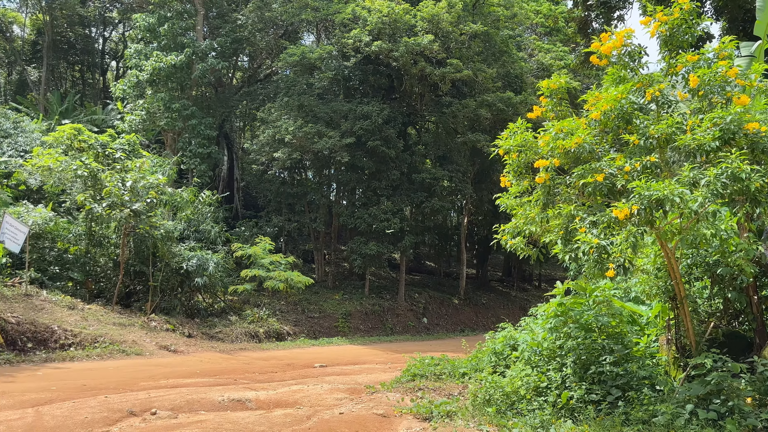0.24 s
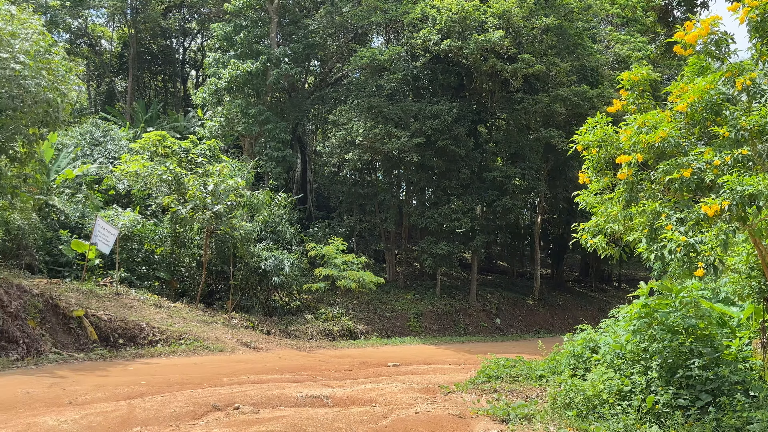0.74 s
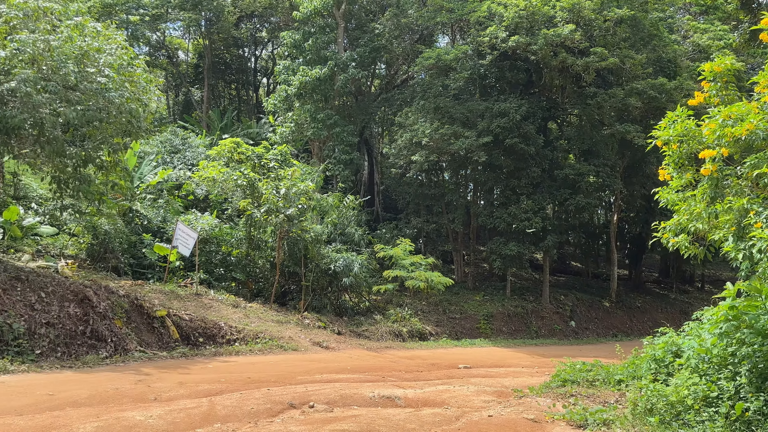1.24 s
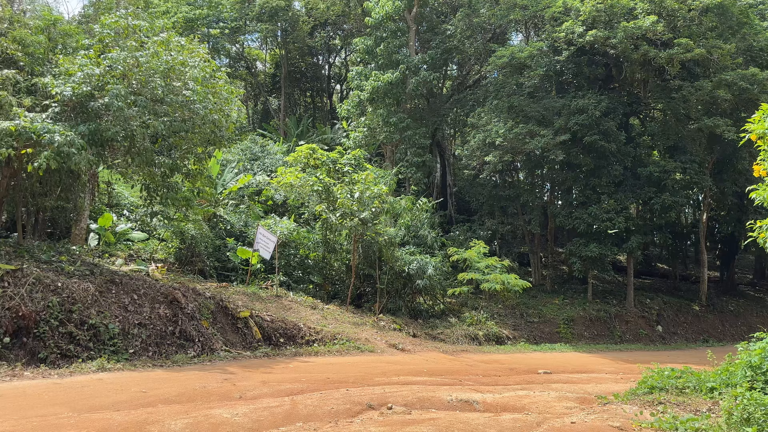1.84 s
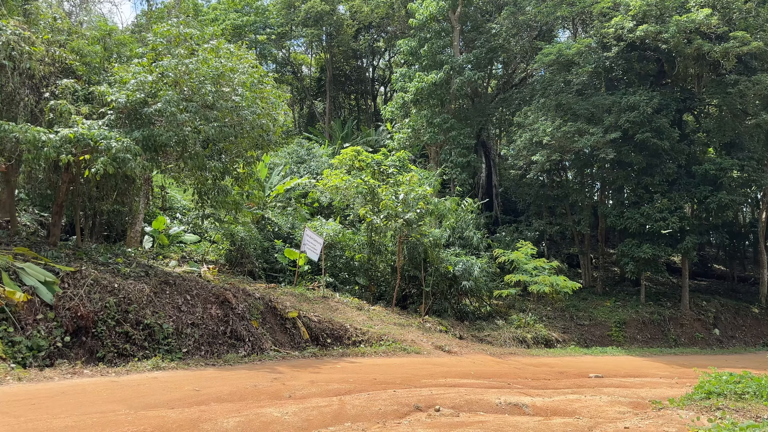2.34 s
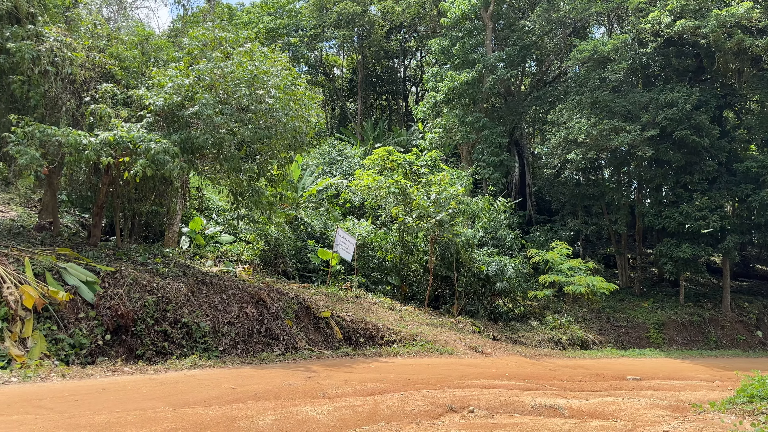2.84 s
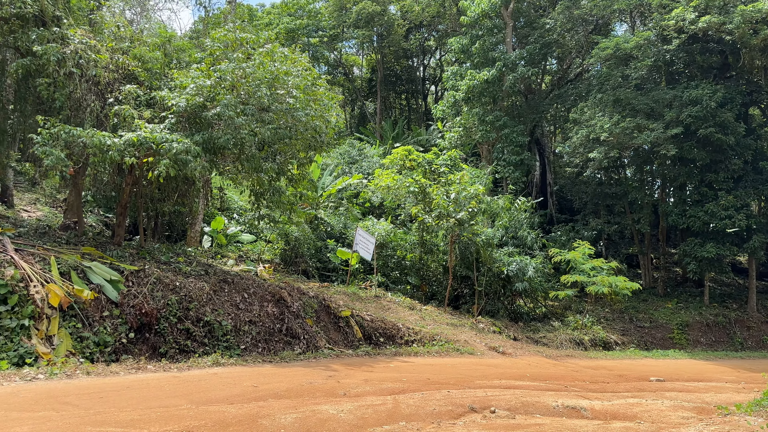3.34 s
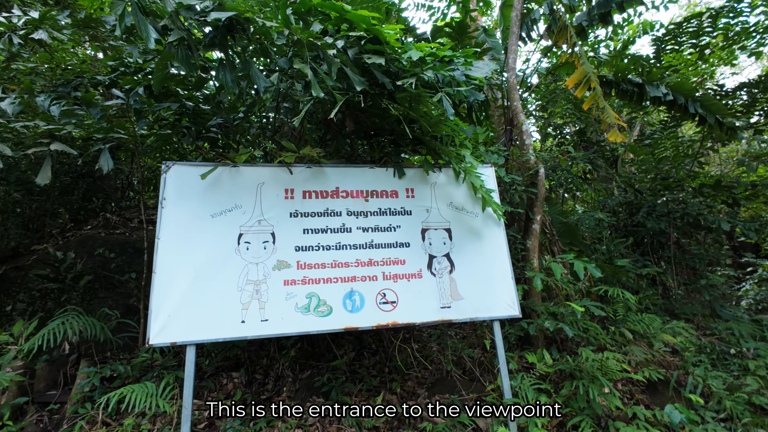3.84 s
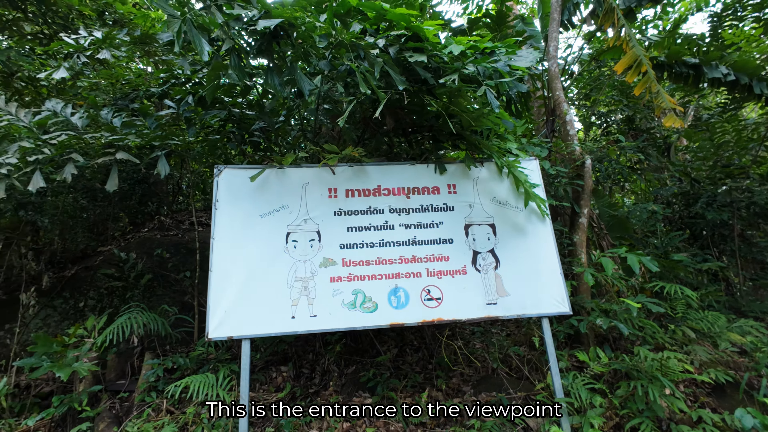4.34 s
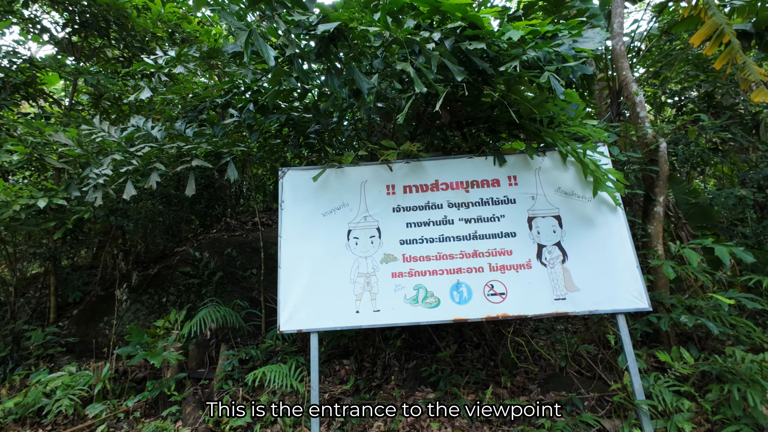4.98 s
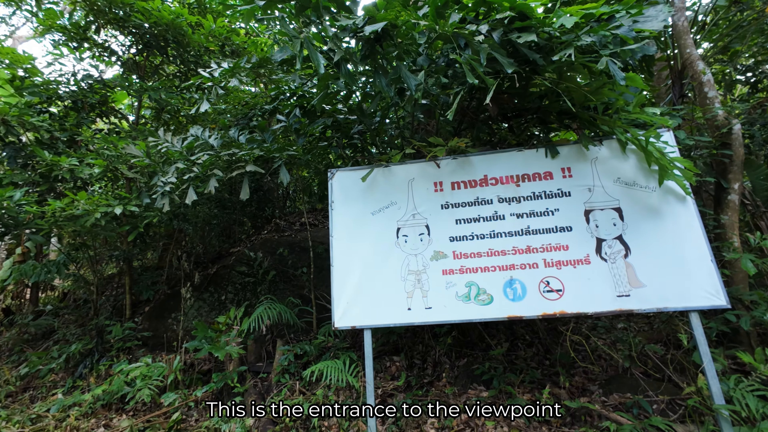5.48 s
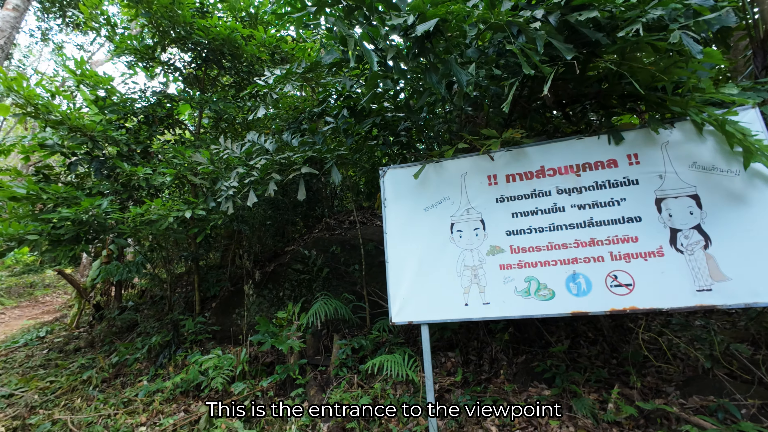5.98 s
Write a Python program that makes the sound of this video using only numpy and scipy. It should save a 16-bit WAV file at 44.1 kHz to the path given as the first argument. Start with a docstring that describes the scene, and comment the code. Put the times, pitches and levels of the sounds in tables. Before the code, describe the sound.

First an open roadside with a wide, bright insect band leaning left: a falling bird whistle, one boomy car door slam ringing off the trees, faint bird notes, then a gritty footstep. Then a sudden change to a closer, mono spot under trees, with a much softer insect hiss, three pulsing cricket chirps, low wind buffeting, a dry woody crack and leaf rustle near the end.

```python
"""Tropical forest: road, then trail

Two spots joined by a cut. At a dirt road (stereo) insects drone, a katydid buzzes very high, small birds
whistle, a car door slams and a shoe scuffs the ground. On a trail under the trees (mono) a cricket chirps,
a bird answers, a twig snaps, leaves rustle and wind bumps the microphone. Struck objects are sums of decaying
modes, calls are gliding or pulsed sines, and grit, wind, choruses and air are shaped noise."""
import sys
import numpy as np
from scipy import signal
from scipy.fft import rfft, irfft
from scipy.io import wavfile
from scipy.ndimage import uniform_filter1d

SR = 44100
rng = np.random.default_rng(int(sys.argv[2]) if len(sys.argv) > 2 else 0)


def transcribe(signal):
    """Save signal, clipped to [-1, 1], as a 16-bit WAV file at the path in sys.argv[1]."""
    frames = np.atleast_2d(signal).T
    limited = np.clip(frames, -1, 1)
    pcm = np.round(limited * 32767).astype(np.int16)
    wavfile.write(sys.argv[1], SR, pcm)


N = 273928
T = np.arange(N) / SR
HZ = np.maximum(np.fft.rfftfreq(N, 1 / SR), 1)
CUT_S, CUTOFF_HZ = 3.592, 15750

# Car door contacts: t/s, relative thump level/dB, relative rattle level/dB
DOOR_CONTACTS = [(1.0363, -18.5, 1), (1.0425, -0.5, 1), (1.063, -36, -6)]
# Door body modes: f/Hz, level/dB, t60/s
DOOR_BODY_MODES = [(53.8, -20, 0.72), (74, -37, 0.22), (77.8, -21.5, 0.46), (88.2, -18, 0.29),
                   (123.5, -24.5, 0.3), (150, -27.5, 0.25), (179, -32.5, 0.31), (215.8, -39, 0.44),
                   (323.4, -45.5, 0.43), (386, -38.5, 0.36), (503, -34, 0.29), (680, -50, 0.13),
                   (822, -36.5, 0.076), (990, -47, 0.11), (1087, -48, .14), (1146, -45, 0.17),
                   (1320, -42.5, 0.1), (1436, -44.5, 0.21)]
# Rattle colour: f/Hz, relative level/dB
DOOR_RATTLE_COLOUR = [(180, -18), (320, -6), (500, 6), (730, -1), (1100, -1.5), (1400, -1.5), (1750, -13),
                      (2600, -11.5), (4000, -19.5), (5400, -14.5), (7000, -20), (9200, -31), (11000, -69)]
# Bright buzz after the slam, colour: f/Hz, relative level/dB
DOOR_BUZZ_COLOUR = [(1500, -11), (3000, 8), (4000, 0), (5200, 3), (6800, 5.5), (9000, -12), (10500, -43)]
# Echo colour: f/Hz, relative level/dB
DOOR_ECHO_COLOUR = [(120, -26), (200, -1), (317, -5), (353, -2.5), (662, -9.5), (1060, -17.5),
                    (1300, -15.5), (1900, -25), (3600, -28), (4680, -60), (7920, -120)]
# Door off to one side: f/Hz, left lead/rad, left minus right level/dB
DOOR_SIDE = [(60, 0, -0.5), (199, 0.44, -1), (490, 2.5, 2), (1100, 1.5, -1), (2400, 3, -5),
             (5500, 7.5, 13.5)]

# Katydid rasp and wing resonance, colour: f/Hz, relative level/dB
KATYDID_COLOUR = [(12000, -43), (12700, -13), (13500, -4), (14500, -1.5), (15000, 1), (15800, -3.5)]
KATYDID_HZ = 15440
KATYDID_START_S, KATYDID_STOP_S = 0.21, 3.06
KATYDID_ATTACK_S, KATYDID_RELEASE_S = 0.04, 0.06
KATYDID_START_DB, KATYDID_SLOPE_DB_PER_S = -72.5, -2
KATYDID_FAR_DB = -99  # others of its kind, far off

# Scuffed grit colour: f/Hz, relative level/dB
SCUFF_COLOUR = [(240, -33), (450, -3.5), (800, -5), (1200, -7), (1600, -5.5), (2400, -4.5), (3250, 2.5),
                (4200, -3.5), (5800, -1), (7500, -1.5), (9000, -14), (11000, -50)]
SCUFF_S, SCUFF_RISE_S, SCUFF_FALL_S, SCUFF_PEAK_DB = 2.872, 0.073, 0.065, -60
GRIT_S, GRIT_SPREAD_S, GRIT_DB = 2.915, 0.2, -72
# Clearest ticks of grit and leaf litter: t/s, relative level/dB, centre f/Hz
CLEAR_TICKS = [(0.136, -63, 790), (.195, -60.5, 3040), (.527, -67.5, 1500), (.736, -61.5, 1480),
               (.753, -61.5, 1080), (.98, -66.5, 2600), (1.61, -67.5, 2900), (2.796, -65, 750),
               (3.484, -61.5, 1150), (3.754, -69, 1080), (3.775, -68, 845), (5.601, -64, 2600)]
FAINT_TICK_REL_DB, FAINT_TICK_HZ = -75, 2000
# Soft bumps: t/s, level/dB, f/Hz
SOFT_BUMPS = [(2.634, -55.5, 347), (3.572, -45.5, 300), (5.284, -53.5, 264), (5.996, -54, 208)]

# Twig modes: f/Hz, level/dB, t60/s, lingering echo level/dB
TWIG_MODES = [(1370, -45, 0.0077, -83), (2330, -42, 0.016, -67), (3300, -47, .008, -67.5),
              (4240, -49, 0.0077, -73), (5100, -56, .006, -76), (6600, -60, .004, -78)]
# Scattered hiss of the snap, colour: f/Hz, relative level/dB
TWIG_HISS_COLOUR = [(700, -7), (1300, -1.5), (2400, -2), (3600, 3), (5100, -2), (5700, -13), (7000, -14),
                    (8500, -32), (12000, -70)]
SNAP_S = 5.6555
# Rustling leaves, colour: f/Hz, relative level/dB
RUSTLE_COLOUR = [(290, -29), (500, -8), (859, -2.5), (1780, -17), (2120, -3.5), (2930, -14), (4550, -13),
                 (7000, -26), (9100, -57), (15400, -120)]
RUSTLE_S, RUSTLE_DB, RUSTLE_RISE_S, RUSTLE_T60_S = 6.085, -70.5, 0.0059, 1

# Cricket chirps at each spot: start t/s, level/dB
ROAD_CRICKET = [(-.1, -77), (1.52, -79.5), (2.56, -81.5), (3.2, -88)]
TRAIL_CRICKET = [(4.004, -60.5), (5.050, -59), (6.105, -58)]
CRICKET_HZ = 4578
# Near bird's falling whistle: t/s, f/Hz, level/dB
NEAR_NOTE = [(.194, 6830, -60), (.203, 6050, -54), (.215, 5620, -52.5), (.232, 5270, -51),
             (.257, 4900, -54), (.285, 4370, -51.5), (.308, 4140, -60), (.326, 4060, -70)]
# Bird notes at each spot: start t/s, length/s, middle level/dB, middle minus end level/dB,
# first f/Hz, middle f/Hz, last f/Hz
ROAD_NOTES = [(1.145, .153, -66.5, 7.5, 3840, 4710, 5930), (2.145, 0.17, -78, -2, 6090, 5810, 6900),
              (2.2, .2, -82.5, -1, 2750, 2642, 3080)]
TRAIL_NOTES = [(4.14, .17, -74, 12, 3960, 4760, 6205), (6.085, 0.065, -87, 7.1, 2130, 2110, 2130)]

# Wind rumble colour: f/Hz, relative level/dB
WIND_COLOUR = [(8.8, -24), (15, 5.5), (33, 1), (62, -3.5), (113, -15), (145, -22.5), (220, -40), (290, -65),
               (480, -120)]
# Gust buffeting colour: f/Hz, relative level/dB
BUFFET_COLOUR = [(40, -14), (75, 6.5), (110, -2), (160, -16.5), (230, -30), (400, -48), (700, -71),
                 (2000, -120)]
# Single gusts: peak t/s, rumble level/dB, buffet level/dB
GUSTS = [(4.52, -50.5, -74), (4.68, -43, -65), (4.78, -49.5, -56), (5.18, -48.5, -61), (5.271, -47.5, -49),
         (5.59, -44, -55), (5.861, -42.5, -39.5), (5.989, -40, -35)]
GUST_RISE_S, GUST_FALL_S = 0.037, 0.047
BREEZE_CUT_DB, BREEZE_SLOPE_DB_PER_S = -54.5, 1.73

# Single insects above the chorus: joining t/s, f/Hz, relative level/dB
SOLO_INSECTS = [(3.7, 7520, -94), (3.3, 7763, -89), (4.0, 8005, -92), (4.8, 8290, -96), (4.6, 8732, -90),
                (4.45, 8865, -92), (4.6, 9320, -96), (5.45, 9460, -90), (4.2, 9680, -97)]
# High insect lisps: peak t/s, level/dB
LISP_SWELLS = [(3.65, -84), (4.15, -85), (4.82, -87), (5.52, -91), (6.15, -81)]
# Lisp colour: f/Hz, relative level/dB
LISP_COLOUR = [(7000, -30), (9500, -2), (11300, -4), (13300, 1), (14400, -4), (15500, -16)]
# Insect chorus colours: f/Hz, relative level/dB
ROAD_CHORUS_COLOUR = [(4000, -28.5), (6800, -13.5), (7270, -7.5), (7860, 3.5), (8400, 2.5), (9850, -10),
                      (10400, -24.5), (11100, -63), (11400, -55), (12000, -41), (15600, -75), (22000, -120)]
TRAIL_CHORUS_COLOUR = [(6900, -29), (7350, -7), (7550, 2.5), (7950, 3.5), (8350, -0.5), (8900, 0.5),
                       (9400, -1.5), (10300, -4), (11200, -12.5), (12600, -9.5), (13300, -7), (14400, -14),
                       (14700, -30)]
ROAD_CHORUS_DB = -67
TRAIL_CHORUS_CUT_DB, TRAIL_CHORUS_SLOPE_DB_PER_S = -81, 0.34

# Steady air colours: f/Hz, relative level/dB
ROAD_AIR_COLOUR = [(13, -59), (22, -17), (37, -15.5), (59, 1), (128, -7), (193, -17.5), (388, -25),
                   (459, -28.5), (859, -36.5), (946, -38), (1150, -37), (3830, -40.5), (4760, -36),
                   (5240, -42), (7000, -45.5), (9100, -69), (15400, -120)]
TRAIL_AIR_COLOUR = [(110, -33), (180, 2.5), (204, -0.5), (366, -5), (530, -8.5), (628, -10.5), (792, -10.5),
                    (1060, -14), (3540, -18.5), (7200, -25.5), (9360, -63), (15800, -120)]
ROAD_AIR_DB, TRAIL_AIR_DB = -60, -72.5
# Left-right likeness of sound from all around: f/Hz, correlation
STEREO_LIKENESS = [(50, 0.98), (130, 0.88), (260, 0.81), (500, 0.16), (1500, .05), (5000, 0.15),
                   (9000, 0.059), (13000, 0.37)]


def car_door(rattle_db=-33, rattle_t60_s=0.094, scatter_db=-6, swish_db=-56, buzz_db=-56, buzz_t60_s=0.61):
    """Latch and seal meet; panels and cabin boom in decaying modes, the lock rattles as noise."""
    first_s, shut_s = DOOR_CONTACTS[0][0], DOOR_CONTACTS[1][0]
    body = 0
    for hz, db, t60_s in DOOR_BODY_MODES:
        for s, thump_db, _ in DOOR_CONTACTS:
            body = body - from_db(db + thump_db) * ring(s, hz, t60_s, rise_s=0.0015)
    # panels radiate little below the cabin's boom
    body = signal.sosfilt(signal.butter(2, 38, "high", fs=SR, output="sos"), body)
    # the latch brushes its striker around first contact
    swish = from_db(swish_db) * swell(first_s, 0.023, 0.023)
    power = sum((from_db(db) * fade(s, 0.00076, rattle_t60_s)) ** 2 for s, _, db in DOOR_CONTACTS)
    rattle = swish + from_db(rattle_db) * np.sqrt(power)
    direct = off_to_one_side(body + latch() + rattle * noise(DOOR_RATTLE_COLOUR))
    scatter = from_db(scatter_db) * rattle * wide_noise(DOOR_RATTLE_COLOUR)
    buzz_gain = from_db(buzz_db + 2 * drift(60)) * fade(shut_s, 0.005, buzz_t60_s)
    buzz = buzz_gain * wide_noise(DOOR_BUZZ_COLOUR) * pan(3.3)
    return direct + scatter + buzz


def latch(level_db=-28, hz=1280, t60_s=0.015):
    """The steel latch clacks on first touch: one short mode."""
    return from_db(level_db) * ring(DOOR_CONTACTS[0][0], hz, t60_s, rise_s=0.0004)


def door_echo(near_db=-45, near_t60_s=0.87, far_db=-54, far_t60_s=0.83, far_delay_s=0.2):
    """The slam returns as decaying noise from the bank nearby, then from the edge of the forest."""
    shut_s = DOOR_CONTACTS[1][0]
    near = from_db(near_db) * fade(shut_s, 0.015, near_t60_s)
    far = from_db(far_db) * fade(shut_s + far_delay_s, 0.024, far_t60_s)
    return np.hypot(near, far) * from_db(drift(22)) * wide_noise(DOOR_ECHO_COLOUR)


def katydid(rasp_db=-1.0, tone_db=-3.5, groups_per_s=23.0, throb_db=4.5, stroke_db=2.6):
    """A very high buzz of resonance and rasp, throbbing with each group of four wing strokes."""
    phase = 2 * np.pi * np.cumsum(groups_per_s * (1 + 0.015 * drift(2))) / SR
    strokes_db = stroke_db * (np.cos(4 * phase) + np.cos(3 * phase + 2) / 2)
    # the wing's resonance follows the throb fully, the rasp of the file only slightly
    tone_gain = rms_one(from_db(throb_db * np.cos(phase) + strokes_db))
    rasp_gain = rms_one(from_db(throb_db / 3 * np.cos(phase) + strokes_db))
    tone = from_db(tone_db) * tone_gain * line(KATYDID_HZ, 230)
    rasp = from_db(rasp_db) * rasp_gain * wide_noise(KATYDID_COLOUR)
    return katydid_bout() * (tone + rasp)


def katydid_bout():
    """Gain of one long bout: quick start, slow sag as it tires, quick stop, over a constant far level."""
    age_s = T - KATYDID_START_S
    attack = age_s / KATYDID_ATTACK_S
    release = 1 - (T - KATYDID_STOP_S) / KATYDID_RELEASE_S
    gate = np.clip(np.minimum(attack, release), 0, 1)
    return gate * from_db(KATYDID_START_DB + KATYDID_SLOPE_DB_PER_S * age_s) + from_db(KATYDID_FAR_DB)


def scuff(grain_db=2.5, patchy_db=2.0):
    """A sole drags over dry grit, then loose grit settles; three bands crackle in clumps of their own."""
    grit = wide_noise(SCUFF_COLOUR)
    low = signal.sosfiltfilt(signal.butter(2, 2000, "low", fs=SR, output="sos"), grit)
    lower_two = signal.sosfiltfilt(signal.butter(2, 4500, "low", fs=SR, output="sos"), grit)
    bands = (low, lower_two - low, grit - lower_two)
    clumps = sum(band * rms_one(from_db(patchy_db * drift(60))) for band in bands)
    grains = rms_one(from_db(grain_db * drift(160)))
    drag = from_db(SCUFF_PEAK_DB) * swell(SCUFF_S, SCUFF_RISE_S, SCUFF_FALL_S)
    loose = from_db(GRIT_DB) * swell(GRIT_S, GRIT_SPREAD_S, GRIT_SPREAD_S)
    return np.hypot(drag, loose) * grains * clumps * pan(4.7)


def footing(tick_t60_s=0.036, bump_t60_s=0.049, tick_gain_db=2):
    """Grit and litter tick as short band-passed noise; soft bumps are single low modes."""
    out = np.zeros((2, N))
    lowpass = signal.butter(2, 7000, "low", fs=SR, output="sos")
    source = signal.sosfilt(lowpass, rng.standard_normal((2, N)))
    for s, db, hz in CLEAR_TICKS + faint_ticks():
        band = signal.butter(1, [hz / 1.86, hz * 1.23], "band", fs=SR, output="sos")
        tick = rms_one(signal.sosfilt(np.vstack([band, band]), source))
        out += from_db(db + tick_gain_db) * fade(s, 0.00028, tick_t60_s) * tick
    for s, db, hz in SOFT_BUMPS:
        out += from_db(db) * ring(s, hz, bump_t60_s, rise_s=0.0017)
    return out


def faint_ticks(count=8, spread_db=0.5):
    """Rows of t/s, relative level/dB, f/Hz for grit that shifts at random."""
    rows = []
    for time, size, pitch in rng.random((count, 3)):
        db = FAINT_TICK_REL_DB + spread_db * (2 * size - 1)
        rows.append((time * T[-1], db, FAINT_TICK_HZ * 2 ** (pitch - 0.5)))
    return rows


def twig_snap(hiss_db=-62, hiss_t60_s=0.33, linger_t60_s=0.56):
    """One woody crack of short modes; hiss and modes linger as scatter among the trees."""
    crack = sum(from_db(db) * ring(SNAP_S, hz, t60_s, rise_s=0.00059) for hz, db, t60_s, _ in TWIG_MODES)
    lingering = sum(from_db(db) * line(hz, 150) for hz, _, _, db in TWIG_MODES)
    hiss = from_db(hiss_db + drift(120)) * noise(TWIG_HISS_COLOUR)
    return crack + fade(SNAP_S, 0.0027, hiss_t60_s) * hiss + fade(SNAP_S, 0.0055, linger_t60_s) * lingering


def rustle():
    """Leaves rustle underfoot and settle: flickering noise with a sudden start and a decay."""
    flicker_db = 3.3 * drift(120)
    envelope = fade(RUSTLE_S, RUSTLE_RISE_S, RUSTLE_T60_S)
    return from_db(RUSTLE_DB + flicker_db) * envelope * noise(RUSTLE_COLOUR)


def cricket(chirps, swell_db=17, sag_hz=170):
    """Five swelling syllables of three wing strokes; the pitch sags in each stroke."""
    syllable_s, stroke_s, half_width_s = 0.043, 0.0135, 0.0036
    out = np.zeros(N)
    for start_s, db in chirps:
        near = (T > start_s - syllable_s) & (T < start_s + 6 * syllable_s)
        for syllable in range(5):
            shy_db = swell_db * max(1 - syllable / 2.33, 0)
            for stroke, stroke_db in enumerate([-2, 0, -9]):
                age_s = T[near] - start_s - syllable * syllable_s - stroke * stroke_s
                effort_db = db + stroke_db - shy_db + rng.normal()
                sag_cycles = sag_hz * age_s ** 2 / (4 * half_width_s)
                cycles = CRICKET_HZ * age_s - sag_cycles + rng.random()
                pulse = np.exp(-(age_s / half_width_s) ** 2)
                out[near] += from_db(effort_db) * pulse * np.sin(2 * np.pi * cycles)
    return np.sqrt(2) * out


def whistle(rows, waver=0.0041):
    """A bird's note: one gliding sine, unsteady in pitch and flickering in level."""
    hz, db = in_time(rows)
    sounding = (T > rows[0][0]) & (T < rows[-1][0])
    gate = uniform_filter1d(1. * sounding, size=200)
    phase = 2 * np.pi * np.cumsum(hz * (1 + waver * drift(90))) / SR
    flicker_db = 2.5 * drift(70)
    return np.sqrt(2) * from_db(db + flicker_db) * gate * np.sin(phase)


def arched_notes(rows):
    """Far birds: each note bends smoothly through three pitches, its level along a parabola."""
    u = np.linspace(-1, 1, 21)  # -1 at the start, 1 at the end
    out = 0
    for start_s, length_s, db, swell_db, first_hz, middle_hz, last_hz in rows:
        slope_hz = (last_hz - first_hz) / 2
        bend_hz = (last_hz + first_hz) / 2 - middle_hz
        hz = middle_hz + slope_hz * u + bend_hz * u ** 2
        out = out + whistle(np.transpose([start_s + length_s * (u + 1) / 2, hz, db - swell_db * u ** 2]))
    return out


def wind(buffet_share_db=-15, lumpy_db=3.0):
    """A freshening breeze rumbles on the microphone; gusts reach into the upper bass."""
    breeze_db = BREEZE_CUT_DB + BREEZE_SLOPE_DB_PER_S * (T - CUT_S)
    rumble = from_db(breeze_db + lumpy_db * drift(5.3))
    buffet = rumble * from_db(buffet_share_db)
    for s, rumble_db, buffet_db in GUSTS:
        gust = swell(s, GUST_RISE_S, GUST_FALL_S)
        rumble = np.hypot(rumble, from_db(rumble_db) * gust)
        buffet = np.hypot(buffet, from_db(buffet_db) * gust)
    return rumble * noise(WIND_COLOUR) + buffet * noise(BUFFET_COLOUR)


def solo_insects(gain_db=-1, rise_db_per_s=3.0, width_hz=38, swell_db=2.5, join_s=0.3):
    """Single insects join one by one, each on its own narrow pitch, and grow louder."""
    growth_db = gain_db + rise_db_per_s * (T - np.mean([CUT_S, T[-1]]))
    out = 0
    for s, hz, db in SOLO_INSECTS:
        joining = np.clip((T - s) / join_s, 0, 1)
        out = out + joining * from_db(db + growth_db + swell_db * drift(3.3)) * line(hz, width_hz)
    return out


def lisps(rise_s=0.06, fall_s=0.1):
    """Soft, very high swells of an insect's rasp, about every two thirds of a second."""
    return sum(from_db(db) * swell(s, rise_s, fall_s) for s, db in LISP_SWELLS) * noise(LISP_COLOUR)


def road_chorus():
    """Many insects drone as one band of wide, slightly unsteady noise."""
    return from_db(ROAD_CHORUS_DB + 0.5 * drift(17)) * wide_noise(ROAD_CHORUS_COLOUR) * pan(3.9)


def trail_chorus():
    """Many insects as one band of mono noise, slowly growing louder."""
    level_db = TRAIL_CHORUS_CUT_DB + TRAIL_CHORUS_SLOPE_DB_PER_S * (T - CUT_S)
    return from_db(level_db) * noise(TRAIL_CHORUS_COLOUR)


def road_air():
    """Steady air at the roadside: wide coloured noise."""
    return from_db(ROAD_AIR_DB) * wide_noise(ROAD_AIR_COLOUR)


def trail_air():
    """Air under the trees: mono coloured noise, drifting slightly in level."""
    return from_db(TRAIL_AIR_DB + 0.5 * drift(3.0)) * noise(TRAIL_AIR_COLOUR)


def forest(x, wet_db, t60_s):
    """Trunks and leaves scatter a call into dense dying echoes, other ones for each ear."""
    age_s = T[:SR]
    echoes = rng.standard_normal((2, SR)) * from_db(-60 * age_s / t60_s) * (age_s > 0.004)
    echoes /= np.sqrt(np.sum(echoes ** 2, axis=1, keepdims=True))
    return x + from_db(wet_db) * signal.fftconvolve(x[None], echoes, axes=1)[:, :N]


def off_to_one_side(x):
    """A close sound reaches the two microphones out of step and unequally loud."""
    lead_rad = per_bin([(hz, lead) for hz, lead, _ in DOOR_SIDE])
    tilt_db = per_bin([(hz, tilt) for hz, _, tilt in DOOR_SIDE])
    sides = np.array([[1], [-1]]) / 2
    return irfft(rfft(x) * np.exp(1j * lead_rad * sides) * from_db(tilt_db * sides), N)


def pan(db):
    """Left and right gain for a level difference in dB."""
    return from_db(np.array([[db], [-db]]) / 2)


def ring(start_s, hz, t60_s, rise_s, phase=0):
    """One struck mode: a decaying sine."""
    return fade(start_s, rise_s, t60_s) * np.sin(2 * np.pi * hz * (T - start_s) + phase)


def fade(start_s, rise_s, t60_s):
    """Envelope of a blow: a quick rise, then exponential decay."""
    age_s = np.maximum(T - start_s, 0)
    return (1 - np.exp(-age_s / rise_s)) * from_db(-60 * age_s / t60_s)


def swell(peak_s, rise_s, fall_s):
    """A smooth bell-shaped rise and fall of height 1."""
    return np.exp(-((T - peak_s) / np.where(T < peak_s, rise_s, fall_s)) ** 2)


def line(hz, width_hz):
    """A tone that flutters in level and pitch: noise through a narrow resonance."""
    resonance = 1 / (1 + ((HZ - hz) / width_hz) ** 2)
    return rms_one(irfft(rfft(rng.standard_normal(N)) * resonance, N))


def noise(colour):
    """Mono noise of a given colour, unit power."""
    return rms_one(irfft(rfft(rng.standard_normal(N)) * from_db(per_bin(colour)), N))


def wide_noise(colour):
    """Stereo noise from all around: alike in the bass, mostly unrelated higher up."""
    alike = np.clip(per_bin(STEREO_LIKENESS), -1, 1)
    mid, side = rfft(rng.standard_normal((2, N)))
    both = np.sqrt(1 + alike) * mid + np.sqrt(1 - alike) * side * [[1], [-1]]
    return rms_one(irfft(both * from_db(per_bin(colour)), N))


def drift(rate_hz):
    """Slow random variation, unit power."""
    return rms_one(irfft(rfft(rng.standard_normal(N)) / (1 + (HZ / rate_hz) ** 2), N))


def per_bin(points):
    """A table over log frequency, read at every bin."""
    hz, value = np.transpose(sorted(points))
    return np.interp(np.log(HZ), np.log(hz), value)


def in_time(rows):
    """Each column of a curve at every sample."""
    s, *columns = np.transpose(rows)
    return [np.interp(T, s, column) for column in columns]


def rms_one(x):
    """Scale to unit power."""
    return x / np.sqrt(np.mean(x ** 2) + 1e-30)


def from_db(db):
    """Decibels to gain."""
    return 10 ** (np.asarray(db) / 20)


def road():
    """The open roadside, in stereo."""
    near_bird = forest(whistle(NEAR_NOTE), wet_db=-3.0, t60_s=0.64) * pan(3.1)
    far_birds = forest(arched_notes(ROAD_NOTES), wet_db=0.5, t60_s=0.6) * pan(4.4)
    chirps = forest(cricket(ROAD_CRICKET), wet_db=8, t60_s=0.79)
    events = car_door() + door_echo() + scuff()
    animals = katydid() + near_bird + far_birds + chirps
    return events + animals + road_chorus() + road_air()


def trail():
    """Under the trees, in mono."""
    bird = forest(arched_notes(TRAIL_NOTES), wet_db=7.0, t60_s=0.47)[0]
    chirps = forest(cricket(TRAIL_CRICKET), wet_db=-9.5, t60_s=0.071)[0]
    events = twig_snap() + rustle() + wind()
    animals = chirps + bird + solo_insects() + lisps()
    return events + animals + trail_chorus() + trail_air()


def scene():
    """The road gives way to the trail in a 12 ms equal-power crossfade."""
    after = np.clip((T - CUT_S) / 0.012 + 0.5, 0, 1)
    feet = footing()
    return np.sqrt(1 - after) * (road() + feet) + np.sqrt(after) * (trail() + feet[0])


def record(dry):
    """The top is cut steeply."""
    return signal.sosfilt(signal.ellip(12, 0.2, 80, CUTOFF_HZ, fs=SR, output="sos"), dry)


dry = scene()
out = record(dry)
transcribe(out)
```